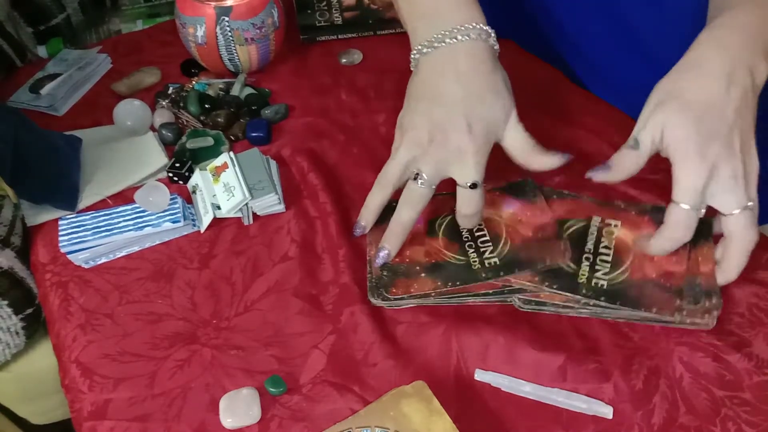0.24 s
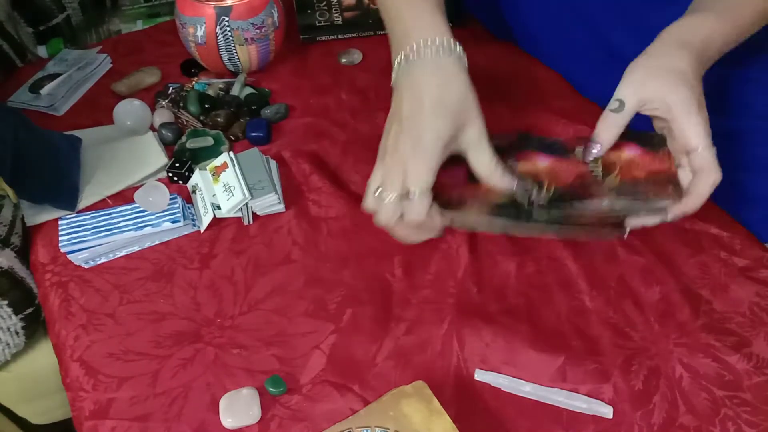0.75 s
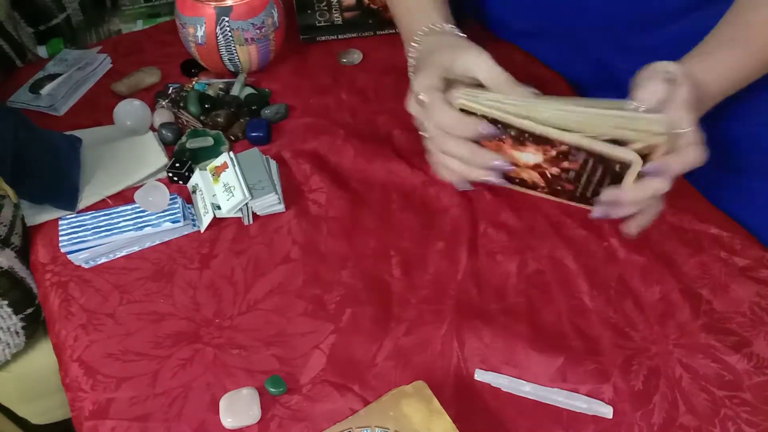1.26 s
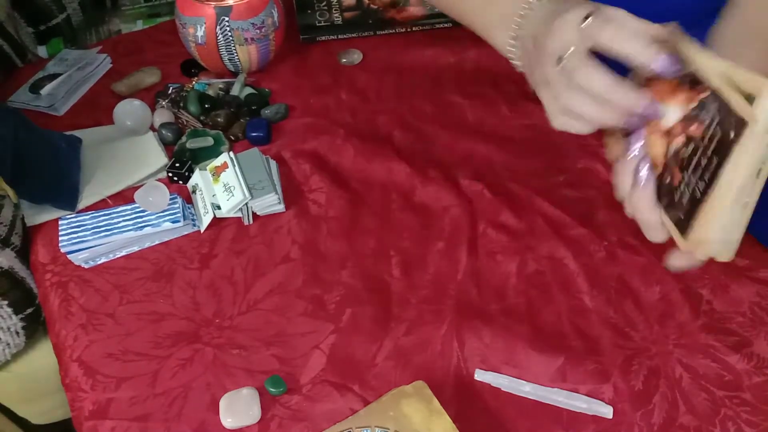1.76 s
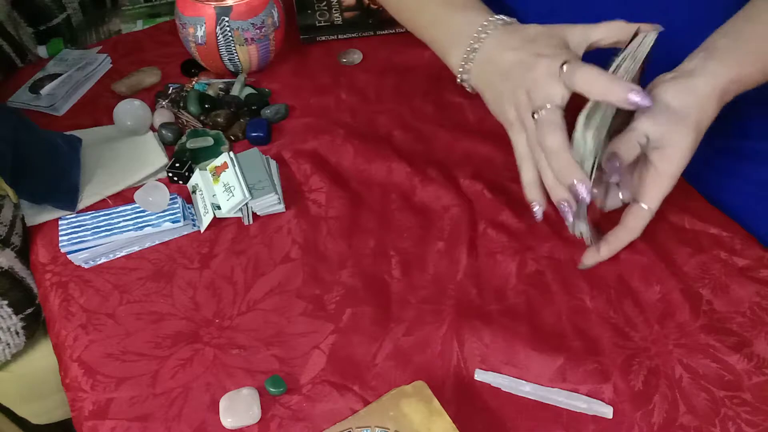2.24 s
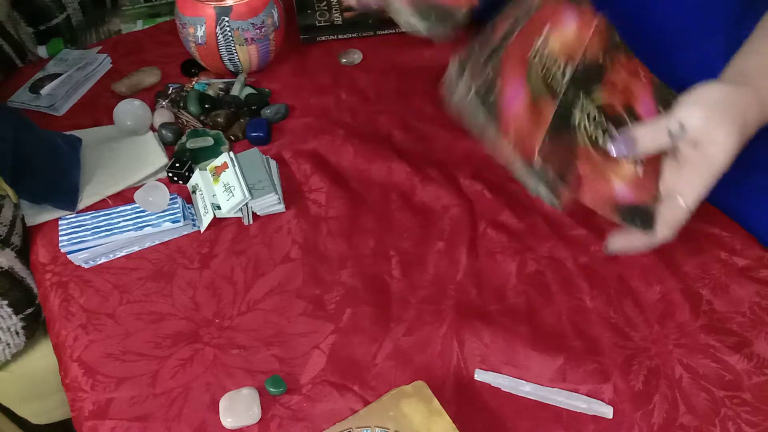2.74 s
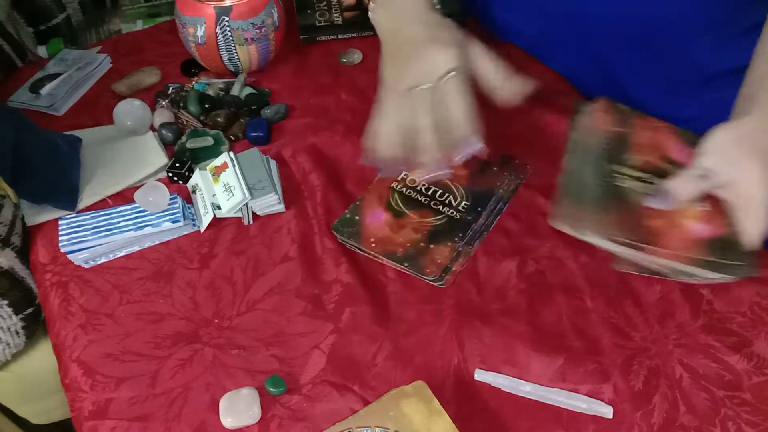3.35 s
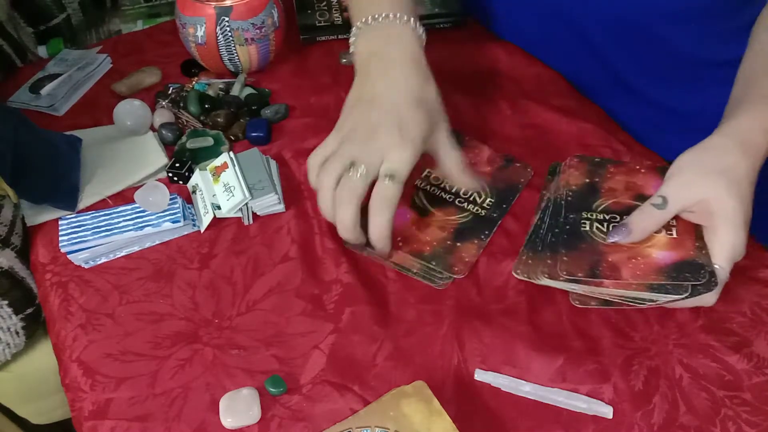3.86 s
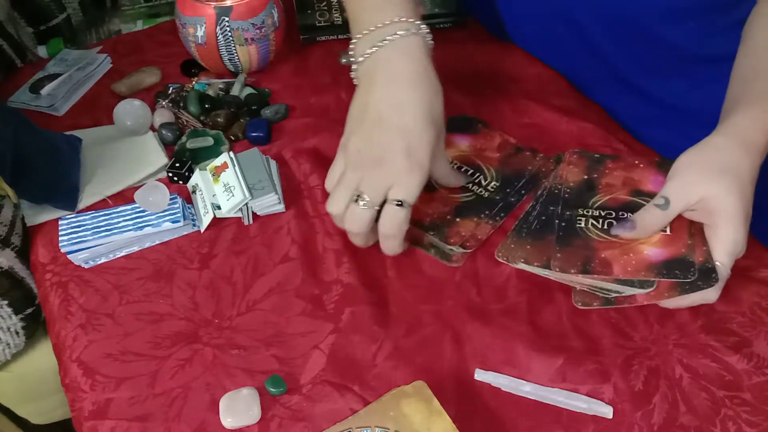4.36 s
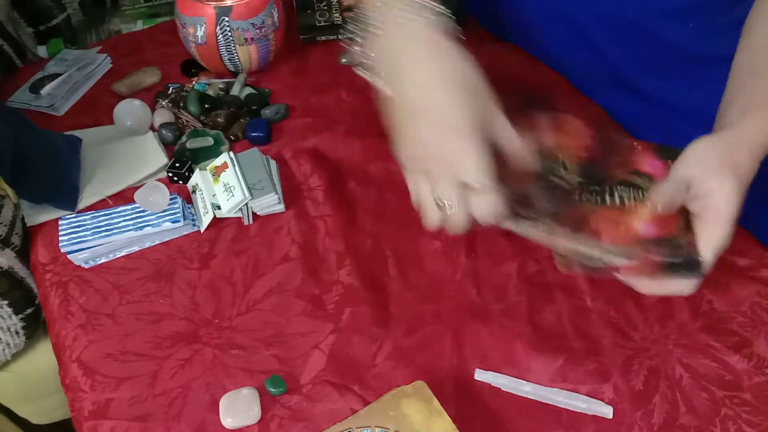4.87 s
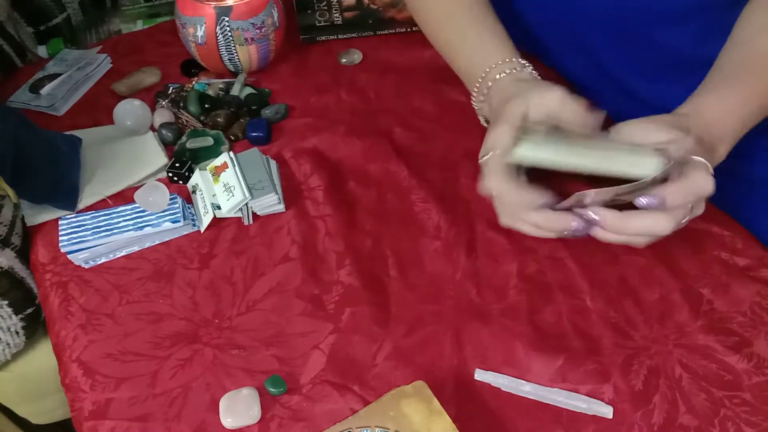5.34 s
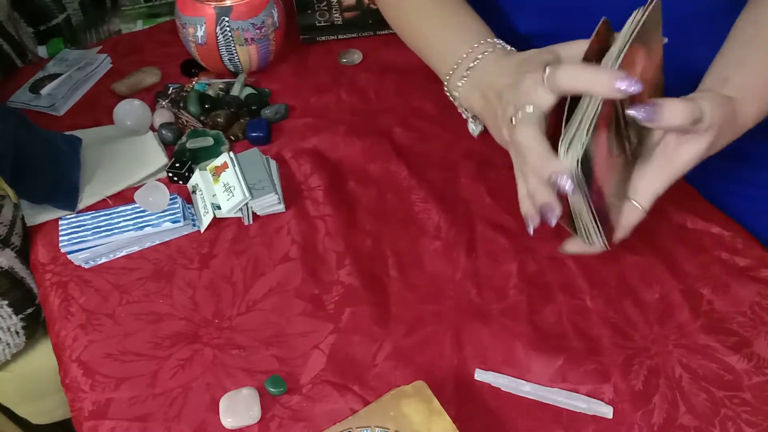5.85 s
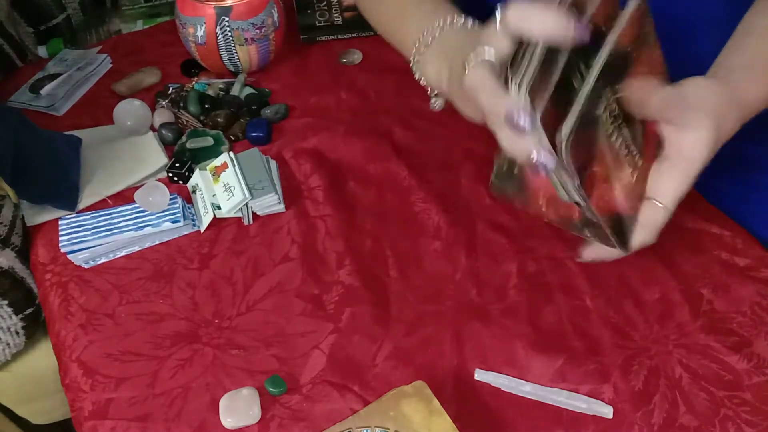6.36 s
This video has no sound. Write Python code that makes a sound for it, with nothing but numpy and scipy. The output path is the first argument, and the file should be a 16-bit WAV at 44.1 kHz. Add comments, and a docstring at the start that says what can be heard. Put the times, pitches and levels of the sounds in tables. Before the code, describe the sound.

A crisp burst of riffling card snaps, then a soft knock, papery slides and small ticks, ending in another sharp snap, in a quiet room.

```python
"""In a quiet room, a deck of large cards is riffled, squared, cut and restacked over a cloth-covered table.
Card edges snap as short noise bursts, each with its own colour, ring and thud into the pile.
Faces slide as gritty hiss, hands and pack push on cloth as noise through hollow tones,
and the pack knocks into the palm. A faint room answers; a ringing microphone port colours the cards.
Steady room tone lies underneath, partly unlike in the two channels."""
import sys
import numpy as np
from scipy import signal
from scipy.fft import rfft, irfft, next_fast_len
from scipy.io import wavfile
from scipy.ndimage import uniform_filter1d

SR = 44100
rng = np.random.default_rng(int(sys.argv[2]) if len(sys.argv) > 2 else 0)


def waveform_to_disk(signal):
    """Save audio, clipped to [-1, 1], as 16-bit WAV at the path in sys.argv[1]."""
    frames = np.transpose(np.atleast_2d(signal))
    scaled = np.clip(frames, -1, 1) * 32767
    samples = np.round(scaled).astype(np.int16)
    wavfile.write(sys.argv[1], SR, samples)


N = 291236  # length in samples


# Card snaps. Each row: start in seconds, relative crack energy in dB, flat slap and brightness in dB
# before their offsets to the crack, fade in ms (held to 0.3-12), card ring in Hz.
CARD_SNAPS = [(0.0108, -15, 2.5, -7.5, 4.6, 1155), (0.036, -10, -0.5, -10.5, 2.6, 2440),
              (0.04, -13, -0.5, -2.5, 4.2, 5930), (0.044, -5.5, 10, -11.5, 7, 1183),
              (0.0535, -1, 6, -7, 2.2, 6900), (0.073, -11.5, -13, 5.5, 1, 7100),
              (0.0724, -6.5, 0, -12.5, 3.7, 2170), (0.0826, -10, 5, -14.5, 7.4, 1870),
              (0.117, -3.5, 10, -3.5, 1.3, 7000), (0.1232, -14, 5, -4.5, 6.8, 1130),
              (0.1438, -5, 4, -16, 1, 730), (0.145, -3.5, -18.5, -3, 1.1, 4560),
              (0.146, -2, 5, -1, 2.3, 1130), (0.153, -7.5, 10, -8.5, 6.8, 3380),
              (.164, -12.5, 1.5, 3.5, .8, 4995), (0.1707, -18, 4.5, -6.5, 2.1, 3570),
              (0.1959, -3.5, 1, -5, 0.87, 6740), (0.2015, -11, 10, -6.5, 5.1, 5210),
              (.21, -8.5, 8.5, -7, 3, 3540), (0.2164, -5, 3, -8, 1.4, 7500),
              (0.228, -4.5, -6.5, -10, 2, 5740), (0.2321, -10.5, 5.5, -6, 7.6, 2333),
              (0.2478, 3, -6.5, -21.5, 1.7, 1530), (0.26, -4.5, 9.5, -3.5, 2.4, 3400),
              (.27, -8, 4, -7.5, 6.1, 3180), (0.5046, -23, -7.5, -16.5, 1.6, 2310),
              (0.6457, -25.5, 1.5, -31, 3.1, 2170), (0.8098, -25, 1.5, -15, 1.9, 1960),
              (0.8381, -39, 14, -25, 3.8, 1510), (1.365, -17.5, -4.5, -16, 3, 7200),
              (1.7123, -9, -1, -11.5, 6.8, 2930), (1.7884, -36.5, -6, -10, 7.3, 3900),
              (1.9226, -50, -0.5, 0.5, 2.2, 5870), (2.292, -44.5, -7.5, 0, 5.7, 4046),
              (2.6221, -35, 10.5, -9, 13, 1420), (2.6478, -19, 5.5, -21.5, 6.5, 1680),
              (2.7566, -21, 6.5, -39, 6.1, 786), (2.8054, -32, 9, -31, 4.4, 1170),
              (2.8343, -34.5, 5.5, -24, 1.6, 880), (2.8642, -32.5, 2.5, -16, 4.4, 930),
              (2.8732, -32.5, 6.5, -22, 3.5, 836), (2.9429, -19.5, 2, -22, 11, 780),
              (2.9552, 0.5, 2, -19, 1.2, 3670), (3.0152, -16, 8.5, -24, 1.7, 1630),
              (3.048, -23, 9.5, -8.5, 1.5, 1850), (3.0544, -22, 6.5, -31, 2.5, 1710),
              (3.066, -21.5, -3.5, -12, 0.89, 1870), (3.1389, -23.5, -4.5, -24, 0.89, 3140),
              (3.147, -16.5, -3.5, -12.5, 6.1, 3080), (3.169, -22, 1.5, -15.5, 0.81, 1050),
              (3.2002, -22.5, -3.5, -32, .9, 2930), (3.2378, -29.5, 9.5, -32, 2, 1145),
              (3.267, -35.5, 8.5, -35.5, 3.5, 1045), (3.5083, -45, 0, -11, 7.8, 3285),
              (3.6774, -40, 3.5, -4.5, 5.7, 1656), (3.8641, -40, -5.5, -2.5, 5.3, 3880),
              (3.9237, -30.5, 1.5, -16, 9.9, 512), (3.963, -22.5, -1.5, -18, 0.59, 6740),
              (4.0204, -36.5, 8, -16, 3.4, 1520), (4.0536, -25, 8.5, -12, 6.6, 2800),
              (4.13, -29, -2, -28.5, 9, 3490), (4.2258, -23, 0.5, -2, 1.5, 2350),
              (4.253, -15, -7, -16, 5.2, 2320), (4.295, -33, 13, -9.5, 3.2, 1105),
              (4.496, -38, 0.5, -10, 5.1, 7040), (4.6361, -15.5, 1.5, -7.5, 4.9, 1156),
              (4.914, -6.5, -4.5, -7.5, 1, 3550), (4.9281, -13, -12.5, -26, 0.53, 3390),
              (4.9499, -14.5, 1, -8.5, 1.5, 3600), (5.0143, -14, -10.5, -13, 2, 5840),
              (5.0309, -17.5, -13, -17, .84, 3560), (5.069, -19.5, 4, -12.5, 2.7, 3450),
              (5.2234, -30.5, -24.5, -8.5, 4.8, 2730), (5.2694, -24, 4, -13.5, 8, 1140),
              (5.2863, -5.5, -7, -32, 0.62, 3360), (5.3158, -10.5, 5, -16.5, 4.5, 1130),
              (5.326, -8.5, 8, -16.5, 1.3, 2170), (5.3622, -12.5, 10, -18.5, 2.4, 1150),
              (5.3861, -12, 0.5, -31.5, 1.1, 2020), (5.3983, -14, 1.5, -16.5, 5.3, 1170),
              (5.408, -13, 9, -25, 0.64, 1980), (5.4381, -16.5, 4.5, -13.5, 1.6, 3660),
              (5.4511, -15.5, -2, -22.5, 0.84, 3330), (5.4669, -25.5, 5.5, -36, .9, 1400),
              (5.4935, -6.5, 3.5, -32.5, 2.2, 1160), (5.504, -22, 9, -34.5, 2.7, 1150),
              (5.5372, -11.5, -13, -12, 0.79, 7000), (5.6307, -25, -27.5, -21, 1.5, 2870),
              (5.6605, -32.5, -11.5, -10, .64, 3470), (6.0236, -26, 6, -35.5, 2.55, 2330),
              (6.0534, -26.5, 1.5, -24, 5, 1750), (6.1264, -28.5, -3, -8, 4.7, 4700),
              (6.144, -20.5, -2, -21, 6.9, 1900), (6.2086, -39.5, 19, -4.5, 1.6, 1440),
              (6.2177, -24, -10, -31, 2.5, 1400), (6.3545, -18, 8, -4.5, 1.97, 1800),
              (6.37, -8, 4, -13, 7.1, 1400), (6.3792, -1, 4.5, -8.5, 2.9, 1680),
              (6.3866, -4, -15, -6, 0.74, 3440), (6.4412, -14, 7, -11, 8.7, 1200),
              (6.5538, -29, -5, -27, 8.5, 3330)]
# Spectra shared by snaps and slides. Each row: frequency in Hz, relative level in dB.
EDGE_LOW = [(900, -41), (1800, 3), (3000, 3), (4000, -2.5), (6000, -34), (12000, -54.5)]  # card edge, lower part
EDGE_HIGH = [(2500, -21), (4000, -2), (6500, -0.5), (8000, -9.5), (10000, -36), (14000, -50)]  # card edge, upper part
CARD_FACE = [(400, -34), (750, -5.5), (950, -4), (1200, 1), (1700, -4), (3000, -44), (6000, -70)]  # flat card face
TOP_SHEEN = [(5000, -29.5), (8000, -2), (10500, -1), (13600, -15.5), (14600, -6.5), (15300, -0.5),
             (15650, -4.5), (15900, -33.5), (16700, -41.5)]  # top of the range
# Padded table under a thud. Each row: frequency in Hz, relative level in dB.
PADDED_TABLE = [(30, -47), (70, -26.5), (130, -7.5), (250, -7), (500, -1), (800, -8), (1500, -50.5),
                (3000, -75)]
SNAP_TICK_DB, TICK_FOLLOWS = 4.5, .48  # upper edge: offset, and dB gained per dB of brightness
SNAP_THUD_DB, THUD_FOLLOWS = -8.5, .4  # thud: offset to the crack, and dB gained per dB of flat slap
EDGE_FADE_SHARE, EDGE_PUSH = .6, 1.3  # the bright edge dies sooner and starts harder than the body
# Size of the first push at the reference fade in ms; by the law, quicker snaps start harder.
PUSH_SIZE, PUSH_FADE_MS, PUSH_LAW = .45, 2, .45
BURST_LEN = 4096  # samples per snap


def snaps():
    """A released card cracks at its edge, slaps flat, and thuds into the pile; each has its own blend."""
    start_s, crack_db, slap_db, bright_db, fade_ms, ring_hz = np.transpose(CARD_SNAPS)[..., None]
    fade_ms = np.clip(fade_ms, .3, 12)
    fade_s = fade_ms / 1000
    hz = np.fft.rfftfreq(BURST_LEN, 1 / SR)

    def blend(*parts):
        """Colours summed by energy into one causal response for each snap."""
        energy = sum((amp(db) * unit(amp(along(colour, hz)))) ** 2 for db, colour in parts)
        return min_phase(np.sqrt(energy))

    body = blend((0, EDGE_LOW), (slap_db - 4.0, CARD_FACE))
    edge = blend((SNAP_TICK_DB + TICK_FOLLOWS * bright_db, EDGE_HIGH), (bright_db, TOP_SHEEN))
    ring = 1 + amp(7) * mode(hz, ring_hz, 0.1 * ring_hz)  # the free length of the card sets its tone
    push = PUSH_SIZE * (PUSH_FADE_MS / fade_ms) ** PUSH_LAW

    body_sound = body * bursts(fade_s, push)
    edge_sound = edge * bursts(EDGE_FADE_SHARE * fade_s, EDGE_PUSH * push)
    crack = ring * (body_sound + edge_sound)
    thud_gain = amp(SNAP_THUD_DB + THUD_FOLLOWS * slap_db)
    thud = thud_gain * causal(PADDED_TABLE)(hz) * bursts(life=0.0051, spike=0.2)
    sounds = amp(crack_db - 1.5) * irfft(crack + thud)

    out = np.zeros(N + SR)
    for start, sound in zip(start_s[:, 0], sounds):
        out[round(start * SR):][:len(sound)] += sound
    return out[:N]


def bursts(life, spike):
    """Spectra of one burst a snap, energy 1: a sharp push at the front of noise dying over life seconds."""
    t = np.arange(BURST_LEN) / SR
    envelope = np.exp(-t / life) * (1 - np.exp(-t / 0.000075))
    rows = rng.standard_normal((len(CARD_SNAPS), len(t))) * envelope
    rows /= np.linalg.norm(rows, axis=1, keepdims=True)
    rows[:, 10:11] -= spike
    return rfft(rows / np.linalg.norm(rows, axis=1, keepdims=True))


# Strokes of face on face. Each row: peak in seconds, relative level in dB, rise and fall in seconds
# (each spans 20 dB), hollow part in dB before its offset, brightness in dB.
FACE_STROKES = [(.056, -35, 0.088, 0.2, 7, -19), (.156, -37, 0.025, 0.061, -2, -8),
                (.259, -32, 0.19, 0.065, -0.5, -8), (.515, -52, 0.042, 0.045, 1, -30),
                (.67, -49, 0.1, 0.13, 1.5, -15), (.82, -54.5, 0.043, 0.28, 3, -16),
                (1.02, -42.5, 0.092, 0.043, 3.5, -17), (1.133, -57, 0.017, 0.019, -25, -28.5),
                (1.227, -53, 0.036, .2, -3, -49), (1.309, -46.5, 0.13, 0.09, 2, -9.5),
                (1.471, -52.5, 0.095, 0.043, 5, -21), (1.67, -60, 0.056, 0.19, 5.5, -8),
                (1.724, -45.5, 0.02, 0.056, 3, -2), (1.81, -52.5, .1, 0.022, 3, -21),
                (1.938, -76, 0.058, 0.33, 18, -6), (2.305, -71, 0.057, 0.59, -7.5, -5.5),
                (2.44, -69.5, 0.37, 0.12, 4, -10.5), (2.575, -68.5, .06, 0.063, -10.5, -14.5),
                (2.654, -48, 0.05, 0.05, -2, -27.5), (2.73, -53.5, 0.11, 0.065, -10.5, 0),
                (2.766, -53.5, 0.11, 0.032, 14, -19), (2.9, -58.5, 0.35, 0.12, 4, -26),
                (2.967, -36, 0.022, 0.2, 4, -25), (3.07, -43, 0.13, 0.14, -3.5, -12),
                (3.163, -37, 0.08, 0.063, 0, -18.5), (3.265, -58.5, 0.095, .03, 7.5, -29),
                (3.52, -67, .03, 0.1, 4.5, -18), (3.618, -68.5, 0.054, 0.032, 6, -4.5),
                (3.69, -71.5, .02, 0.073, 8, -3.5), (3.877, -65.5, .02, 0.19, -1.5, -3.5),
                (3.975, -59, 0.1, 0.18, -2, -13), (4.065, -53.5, 0.029, 0.049, 9, -19),
                (4.139, -54.5, 0.07, 0.07, -1, -37), (4.234, -45, 0.017, .13, 2.5, -22.5),
                (4.508, -66, 0.35, 0.11, 0, -8.5), (4.649, -41.5, 0.017, 0.038, 6, -15),
                (4.927, -42, 0.034, 0.12, 5.5, -13.5), (5.027, -47.5, 0.025, 0.1, 0.5, -26),
                (5.09, -69, .05, 0.043, 6, -24), (5.238, -52.5, 0.085, 0.19, -30, -11),
                (5.33, -52.5, 0.21, 0.24, 23, -22), (5.406, -44, 0.27, 0.074, 10.5, -14),
                (5.505, -54, 0.056, 0.15, 18, -49), (5.547, -49, 0.039, 0.065, 3.5, -36),
                (5.649, -50.5, 0.047, 0.05, -7.5, -23), (5.77, -59.5, 0.19, 0.14, -5.5, -15.5),
                (5.89, -63, 0.074, .08, 5, -26), (6.03, -52, 0.037, 0.42, 2.5, -19.5),
                (6.148, -52.5, .08, .08, 8, -10), (6.19, -51.5, 0.032, 0.033, -1, 8),
                (6.23, -64.5, 0.044, 0.025, 14.5, -17.5), (6.391, -32, 0.031, 0.054, 5.5, -10.5),
                (6.567, -46.5, 0.097, 0.16, -1, -15.5)]
STROKE_FINE_DB, FINE_FOLLOWS = 2, .3  # fine hiss: offset, and dB gained per dB of brightness


def slides():
    """Coated faces rub with a slightly gritty, uneven hiss; the same catches roughen every range."""
    gain, hollow_db, bright_db = swells(FACE_STROKES)
    catches = grit(per_s=210, spread_db=3.5, life=0.0006)

    def hiss(colour):
        """Gritty noise in one colour, patchy in pitch and time."""
        noise = catches * rng.standard_normal(N)
        return patchy(filtered(noise, causal(colour)), depth_db=3.5)

    fine_db = STROKE_FINE_DB + FINE_FOLLOWS * bright_db
    layers = [(0, EDGE_LOW), (hollow_db - 2, CARD_FACE), (fine_db, EDGE_HIGH), (bright_db, TOP_SHEEN)]
    return amp(-5.0) * gain * sum(amp(db) * hiss(colour) for db, colour in layers)


# Hands and pack pushing on cloth and palms. Each row: peak in seconds, relative level in dB,
# rise and fall in seconds (each spans 20 dB), centre of the boom in Hz.
CLOTH_PUSHES = [(.05, -28.5, 0.07, 0.096, 536), (.148, -29, 0.022, 0.025, 490),
                (.202, -25.5, 0.009, 0.075, 310), (.235, -28, 0.11, 0.078, 220),
                (.365, -48, .03, 0.077, 180), (.5, -60, 0.12, .3, 302), (.579, -43, 0.029, 0.031, 360),
                (.653, -53, 0.11, .11, 333), (1.02, -52, 0.086, 0.047, 597),
                (1.181, -28.5, .008, 0.14, 210), (1.25, -38, 0.059, 0.062, 460),
                (1.489, -57.5, 0.112, 0.067, 177.7), (1.72, -39, 0.009, 0.019, 544),
                (2.04, -71.5, 0.29, 0.14, 497), (2.31, -60.5, .06, 0.058, 149.9),
                (2.658, -64.5, 0.041, .1, 479), (2.766, -45, 0.0089, 0.029, 520),
                (2.881, -47, 0.024, 0.04, 664), (2.95, -39, 0.015, 0.23, 424),
                (3.045, -42.5, .1, 0.052, 400), (3.137, -31, 0.0065, 0.058, 167),
                (3.185, -44, .05, .03, 172), (3.558, -51.5, 0.019, 0.074, 210.8),
                (3.935, -43.5, 0.049, 0.16, 331), (4.065, -54, 0.044, 0.093, 433),
                (4.258, -48.5, 0.024, 0.096, 360), (4.318, -48.5, 0.093, .12, 235),
                (4.5, -62.5, .4, 0.12, 170.5), (4.645, -46, 0.0068, 0.03, 408),
                (4.935, -42.5, 0.023, 0.046, 348), (5.019, -42.5, 0.0072, 0.038, 620),
                (5.074, -50.5, 0.013, 0.03, 580), (5.265, -46, 0.069, 0.08, 230),
                (5.33, -49.5, 0.09, 0.067, 420), (5.42, -46, 0.062, 0.072, 464),
                (5.5, -42.5, .01, 0.018, 586), (5.6, -69, 0.045, .4, 199), (6.06, -64, 0.1, 0.22, 508),
                (6.148, -44.5, 0.023, 0.043, 400), (6.226, -41.5, 0.028, 0.018, 370),
                (6.385, -33, 0.03, 0.024, 510), (6.453, -40, 0.022, 0.0097, 540),
                (6.579, -47.5, 0.03, 0.04, 200)]
# Hollow tones of table and pack. Each row: frequency in Hz, width in Hz of one of two equal passes.
HOLLOW_TONES = [(105, 40), (150, 14), (200, 30), (255, 83), (320, 45), (400, 61), (465, 61), (590, 18),
                (710, 210)]


def pressing():
    """Soft pushes wake the hollow tones, most of all those nearest to the centre of the boom."""
    gain, centre_hz = swells(CLOTH_PUSHES)
    push = grit(per_s=20, spread_db=2.5, life=0.0057) * rng.standard_normal(N)
    boom, shares = 0, []
    for tone_hz, width_hz in HOLLOW_TONES:
        octaves_off = np.log2(np.abs(centre_hz) / tone_hz)
        share = np.exp(-(octaves_off / .5) ** 2) + 0.32
        tone = unit(filtered(push, lambda hz: mode(hz, tone_hz, width_hz) ** 2))
        boom = boom + share * tone
        shares.append(share)
    return amp(-1.5) * gain * boom / np.linalg.norm(shares, axis=0)


# Pack knocked square in the palm. Each row: time in seconds, level of the hollow body in dB.
PALM_KNOCK = [(1.165, -84), (1.175, -44.5), (1.229, -21.5), (1.303, -57), (1.311, -49.5), (1.33, -57.5)]
# Resonances of the held pack. Each row: frequency in Hz, width in Hz, relative level in dB.
HELD_PACK = [(96, 48, -10.5), (157, 35, -1), (203, 65, -7), (300, 10, 10), (470, 18, 7), (603, 21, -0.5),
             (828, 130, -7), (1346, 42, -11)]
# Upper part of the knock. Each row: frequency in Hz, relative level in dB.
KNOCK_RUSH = [(600, -25.5), (1000, 6), (1500, -3.5), (2500, -13), (3600, -30.5), (5000, -42)]


def knock():
    """The pack lands in the palm: noise through its resonances, with a quieter rush above."""
    def hollow(hz):
        """The pack's resonances, alternating in polarity."""
        return sum((-1) ** k * amp(db) * mode(hz, centre_hz, width_hz)
                   for k, (centre_hz, width_hz, db) in enumerate(HELD_PACK))

    body = unit(filtered(rng.standard_normal(N), hollow))
    level_db, = curves(PALM_KNOCK)
    rush = unit(filtered(rng.standard_normal(N), causal(KNOCK_RUSH)))
    return amp(level_db) * (body + amp(-12.5) * rush)


# Decay of the room. Each row: frequency in Hz, time in seconds to fall 60 dB.
ROOM_DECAY = [(100, 0.39), (700, 0.062), (2000, 0.1), (5000, 0.14), (13000, 0.058)]


def room(x):
    """The walls answer after a few milliseconds with decaying noise; each quarter second has its own tail."""
    out, step = np.zeros(N + 2 * SR), SR // 4
    for start in range(0, N, step):
        hz, t, z = signal.stft(rng.standard_normal(SR // 2), SR, nperseg=256)
        decay = amp(-60 * t / along(ROOM_DECAY, hz)[:, None])
        tail = signal.istft(z * decay, SR, nperseg=256)[1]
        wet = signal.fftconvolve(x[start:start + step], tail / np.linalg.norm(tail))
        out[start + 170:][:len(wet)] += wet  # delay in samples
    return out[:N]


# Ring of the microphone port. Columns: frequency in Hz, width in Hz, level in dB added to the direct sound.
PORT_RING = (1263, 30, 8.27)


def port(x):
    """The microphone port adds one narrow resonance to the sound passing through it."""
    ring_hz, width_hz, ring_db = PORT_RING
    return filtered(x, lambda hz: 1 + amp(ring_db) * mode(hz, ring_hz, width_hz))


# Room tone, alike in both channels and then opposite in them. Each row: frequency in Hz, relative level in dB.
AIR_ALIKE = [(26, -38.5), (45, -4.5), (112, 0.5), (230, -1.5), (310, -6), (496, -6), (968, -12.5),
             (1270, -1.5), (1370, -10), (1710, -15), (5610, -22), (8130, -28.5), (15100, -27),
             (16700, -48.5)]
AIR_APART = [(15, -52), (25, -23), (115, -6), (233, -7.5), (259, -8), (512, -8), (984, -10), (1260, -6),
             (1840, -11), (14900, -31), (16700, -40.5)]
AIR_DB, APART_DB = -70, -76.5  # rms levels in dB


def room_tone():
    """Two steady coloured noises: one shared by the channels, one to be added left and subtracted right."""
    air = amp(AIR_DB) * unit(filtered(rng.standard_normal(N), causal(AIR_ALIKE)))
    side = amp(APART_DB) * unit(filtered(rng.standard_normal(N), causal(AIR_APART)))
    return air, side


ROUNDING = 1.1  # over 1: gestures crest softly and stop briskly


def swells(rows):
    """Overlapping gestures that rise and fall: joint gain, and each further column blended by loudness."""
    peak_s, level_db, rise_s, fall_s, *cols = np.transpose(rows)[..., None]
    t = np.arange(0, N + 64, 64) / SR  # one point every 64 samples
    span_s = np.maximum(np.where(t < peak_s, rise_s, fall_s), .004)
    drop_db = 20 * (np.abs(t - peak_s) / span_s) ** ROUNDING
    power = amp(level_db - drop_db) ** 2 + 1e-30
    total = power.sum(axis=0)
    joint = [np.sqrt(total)] + [(power * col).sum(axis=0) / total for col in cols]
    return [np.interp(np.arange(N) / SR, t, line) for line in joint]


def grit(per_s, spread_db, life):
    """Gain of a rubbing noise: tiny catches of uneven size, each fading in life seconds."""
    sizes_db = spread_db * np.minimum(rng.exponential(size=N), 3)
    catches = (rng.random(N) < per_s / SR) * amp(sizes_db)
    return 1 + signal.lfilter([1], [1, -np.exp(-1 / (life * SR))], catches)


def patchy(x, depth_db):
    """Random patches of gain, some hundred hertz by some tens of milliseconds; rms 1."""
    z = signal.stft(x, nperseg=256)[2]
    across_hz = uniform_filter1d(rng.standard_normal(z.shape), size=5, axis=0)
    field = uniform_filter1d(across_hz, size=12, axis=1)
    return unit(signal.istft(z * amp(depth_db * unit(field)), nperseg=256)[1][:N])


def mode(hz, centre_hz, width_hz):
    """One resonance, gain 1 at its centre."""
    return 1j * hz * width_hz / (centre_hz ** 2 - hz ** 2 + 1j * hz * width_hz)


def causal(points):
    """Causal response of a (Hz, dB) spectrum, energy 1."""
    return lambda hz: min_phase(unit(amp(along(points, hz))))


def min_phase(gain):
    """The causal response with these magnitudes, so that nothing sounds before a blow."""
    half = gain.shape[-1]
    cepstrum = irfft(np.log(gain))
    cepstrum[..., 1:half - 1] *= 2
    cepstrum[..., half:] = 0
    return np.exp(rfft(cepstrum))


def filtered(x, response):
    """x times a response on the frequency grid, padded so that ringing does not wrap round."""
    m = 2 * next_fast_len(N // 2 + SR // 4)
    return irfft(rfft(x, m) * response(np.fft.rfftfreq(m, 1 / SR)), m)[..., :N]


def curves(rows):
    """One value per sample for each column after the time; -120 dB outside."""
    s, *cols = np.transpose(rows)
    return [np.interp(np.arange(N) / SR, s, col, -120, -120) for col in cols]


def along(points, hz):
    """(Hz, value) points read on a log frequency axis."""
    f, v = np.transpose(points)
    return np.interp(np.log(hz + 1), np.log(f + 1), v)


def unit(x):
    """Scaled to rms 1."""
    return x / np.sqrt(np.mean(x ** 2) + 1e-20)


def amp(db):
    """Decibels to gain."""
    return 10 ** (np.asarray(db) / 20)


def scene():
    """The cards reach both channels alike through one port; part of the room tone differs."""
    hits, rub = snaps(), slides()
    reflected = room(amp(-9.0) * hits + amp(-14.5) * rub)
    near = port(hits + rub + pressing() + knock() + reflected)
    air, side = room_tone()
    return np.array([near + air + side, near + air - side])


TOP_HZ = 16800  # band limit


def record(dry):
    """Nothing is kept from the band limit up."""
    return filtered(dry, lambda hz: hz < TOP_HZ)


dry = scene()
out = record(dry)
waveform_to_disk(out)
```